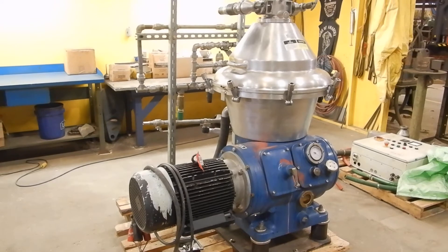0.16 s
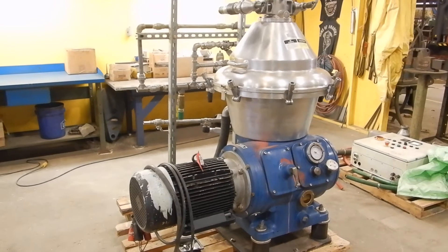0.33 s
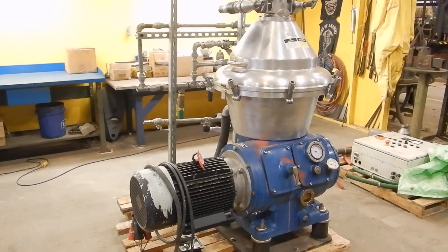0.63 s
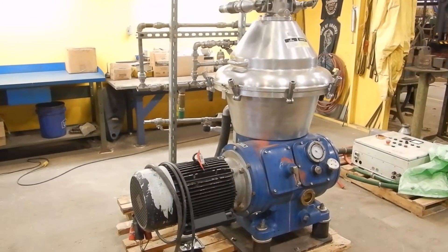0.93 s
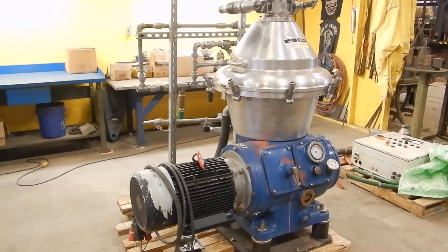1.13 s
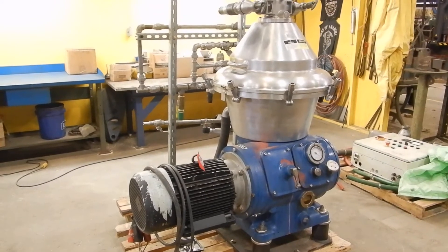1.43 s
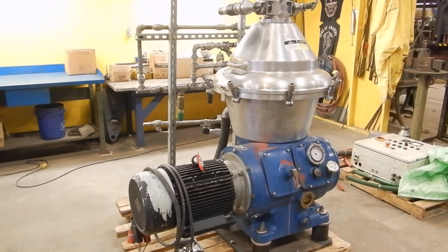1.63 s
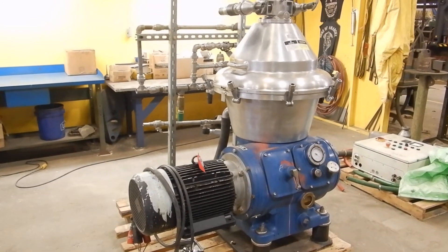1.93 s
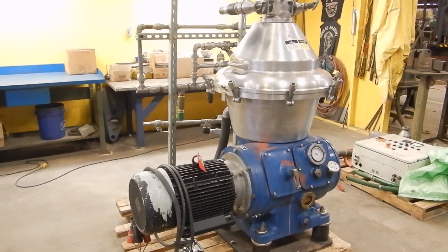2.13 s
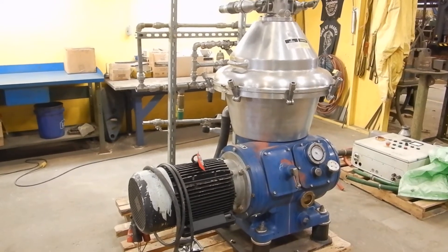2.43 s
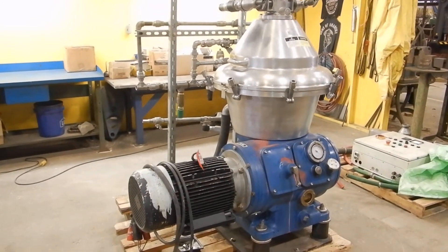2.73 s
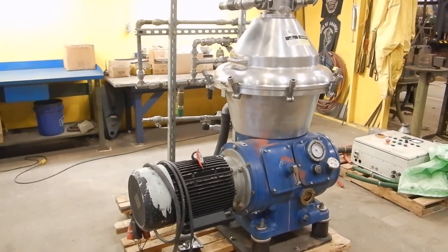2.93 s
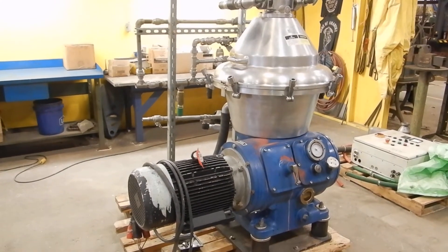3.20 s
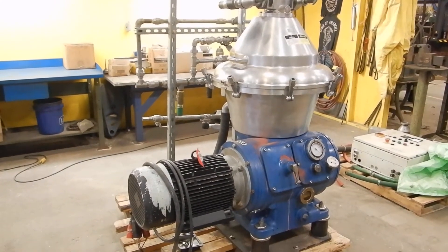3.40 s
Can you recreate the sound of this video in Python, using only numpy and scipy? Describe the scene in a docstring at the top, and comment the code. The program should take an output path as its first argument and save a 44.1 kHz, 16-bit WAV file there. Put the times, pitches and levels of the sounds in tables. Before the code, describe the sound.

A high whine from a big centrifuge pulses throughout, dipping a little in pitch and jumping back again and again. Beneath it are the even rush of spinning machinery and a soft, wavering hum, close by in a lightly echoing workshop.

```python
"""A high, throbbing whine sags in pitch and snaps back every third to half second, over a steady roar.
It is a large disc centrifuge in a workshop. The switching frequency of the motor drive modulates a
cluster of tones, and fainter clusters at twice and three times the pitch; all slide through the modes
of the motor frame. Bowl, fan and gears give broadband noise, coloured by the resonances of the casing.
A low wavering hum and a few faint tones come and go."""
import sys
import numpy as np
from scipy import signal
from scipy.fft import rfft, irfft, next_fast_len
from scipy.io import wavfile

SR = 44100
rng = np.random.default_rng(int(sys.argv[2]) if len(sys.argv) > 2 else 0)


def output_pcm(signal):
    """Save a mono or channel-first signal as 16-bit PCM at the path in sys.argv[1].

    Samples are clipped to [-1, 1] before scaling.
    """
    pcm = np.clip(np.atleast_2d(signal).T, -1, 1) * 32767
    wavfile.write(sys.argv[1], SR, np.round(pcm).astype(np.int16))


N = 156996

# noise spectrum of bowl, fan and gears, before its peaks and dips: f/Hz, spectral density level/dB
ROAR_SPECTRUM = [(25, -89), (40, -84), (60, -77.5), (75, -78.5), (119, -72.5), (181, -62.5), (250, -62),
                 (320, -65), (400, -60.5), (499, -65.5), (600, -68), (660, -70.5), (760, -65.5), (840, -61),
                 (960, -69), (1080, -59), (1220, -60.5), (1340, -65.5), (1420, -64), (1500, -57),
                 (1680, -45), (1850, -56), (1920, -60), (2050, -65), (2200, -67), (2430, -74.5),
                 (2700, -71.5), (3000, -72), (3150, -67.5), (3440, -65.5), (3700, -71.5), (3890, -78),
                 (4150, -74), (4500, -76), (4800, -77.5), (5110, -75), (5400, -82), (5700, -85.5),
                 (6080, -89), (6600, -86), (6880, -89), (7200, -93.5), (7600, -93.5), (8100, -100.0),
                 (8500, -99.1), (9260, -106.1), (10000, -117.9), (10400, -119.2), (10700, -114.6),
                 (12500, -118.1)]
# resonances of the casing, and narrow dips in the roar's spectrum: f/Hz, bandwidth/Hz, gain/dB
ROAR_PEAKS_AND_DIPS = [(57, 8, 1.5), (87, 7.5, 10), (196, 9.2, 1), (297.8, 4.7, 5), (341.8, 7.6, 8),
                       (448, 15, 6.5), (695.5, 15, 9), (819, 12, 4), (880, 9.6, 3), (932, 8.5, 10),
                       (983, 26, 4.5), (1257, 34, 4), (1400, 12, 3), (1410, 40, -5), (1560, 60, -7),
                       (1895, 50, -4), (3085, 60, -4), (2042, 26, 4), (2552, 24, 8.5), (4156, 48, 4.5),
                       (4440, 34, 2.5), (4870, 30, 3), (4930, 61, 5.5), (5270, 39, 6), (5820, 40, 6),
                       (6820, 60, 6), (7520, 60, 7)]
# interaural coherence of the roar: f/Hz, coherence
ROAR_COHERENCE = [(60, 0.77), (120, 0.97), (250, 1), (510, 0.99), (1040, 0.97), (2120, 0.91), (4320, 0.85),
                  (8810, 0.4)]
# interaural level of the roar: f/Hz, left over right/dB
ROAR_BALANCE = [(60, 1), (100, -0.5), (180, -1.5), (320, -1), (550, -1.5), (960, -1.5), (1670, -4),
                (2910, 0.5), (5060, -1.5), (8810, 0.5)]
# interaural phase of the roar: f/Hz, left lead/rad
ROAR_PHASE = [(0, 0), (1290, 0.2), (3360, 0.4), (4390, 0.37), (4740, 0.11), (5510, 0.89), (5940, 0.5),
              (6460, 0.93), (6890, 0.9), (7580, 1.0), (8010, 0.3), (8610, 0.86), (8960, 0.9)]
# envelope of the hum: t/s, level/dB
HUM_ENVELOPE = [(0.0, -47.5), (0.03, -32.5), (0.21, -45), (0.51, -29.5), (0.57, -32), (0.8, -27.5),
                (0.86, -31.5), (0.9, -35.5), (1.02, -42.5), (1.05, -30.5), (1.13, -40.5), (1.38, -42.5),
                (1.41, -59), (1.45, -36), (1.66, -50.5), (1.99, -33), (2.22, -45), (2.37, -32.5),
                (2.72, -43), (2.74, -37.5), (3.039, -40), (3.16, -32), (3.29, -42.5), (3.56, -50)]
# passing tones: onset t/s, duration/s, f/Hz, greatest level/dB
FAINT_TONES = [(1.65, .6, 190, -44), (2, .8, 88, -56), (2.5, 1, 860, -43.5), (-0.1, 3.3, 821, -51),
               (0.0, 3.56, 2556, -54.5)]
# instants at which the switching frequency starts to snap back: t/s
SNAP_TIMES = [-.36, -.02, .28, .63, .97, 1.345, 1.73, 2.13, 2.555, 3.005, 3.46, 3.93]
# motor tones, before the frame: multiple of the sweep, f/Hz at zero offset, level/dB,
# level slope with offset/(dB/Hz), left over right/dB, left lag/rad
WHINE_PARTIALS = [(1, 1430, -49.9, 0.13, -2.9, -0.3), (1, 1466.9, -42.9, -0.11, -2.8, -0.39),
                  (1, 1486.1, -47.0, -0.14, -2.4, -0.36), (1, 1520.1, -37.5, 0.5, -2.7, -0.39),
                  (1, 1576, -47.5, 0.73, -2.0, -0.34), (1, 1611.8, -34.0, 0.35, -2.1, -0.34),
                  (1, 1646.1, -38.0, 0.04, -2.0, -0.33), (1, 1664.5, -21.8, -0.1, -2.5, -0.32),
                  (1, 1732.8, -42.0, -0.03, -1.3, -0.3), (1, 1751.25, -25.2, -0.02, -1.7, -0.39),
                  (1, 1804.0, -38.5, 0.13, -1.5, -0.29), (1, 1841.1, -45.2, 0.11, -2.1, -0.32),
                  (1, 1857.9, -41.1, 0.35, -2.2, -0.29), (1, 1982.6, -34.8, -0.17, -1.6, -0.36),
                  (2, 3153.3, -60.1, -0.6, -0.4, -0.44), (2, 3182.2, -53.7, -0.27, -1.0, -0.5),
                  (2, 3240.7, -53.0, -0.18, 0.5, -0.54), (2, 3270, -59.7, -0.15, 0.8, -0.59),
                  (2, 3300, -55.8, 0.15, -0.2, -0.49), (2, 3332.3, -50.6, 0.14, -0.2, -0.49),
                  (2, 3385, -57.3, 0.01, 0.8, -0.68), (2, 3420.4, -55.6, 0.16, -1.2, -0.64),
                  (2, 3446, -54.4, 0.37, 0.3, -0.46), (2, 3471.6, -54.1, -0.08, -0.4, -0.43),
                  (2, 3526.7, -55.8, -0.09, 0.0, -0.34), (2, 3558.4, -51.7, -0.52, 1.1, -0.45),
                  (2, 3649.9, -55.1, 0.38, 1.6, -0.36), (2, 3730, -60.4, -0.55, 0.7, -0.28),
                  (3, 4903.5, -65.2, -0.3, -2.0, -0.45), (3, 5008.5, -63.7, 0.12, -4.1, -0.53),
                  (3, 5157.9, -65.2, -0.46, -1.0, -0.43)]
# amplitude modulation by the turning parts, the first once per turn of the motor shaft: f/Hz, depth/dB
ROTATION_THROBS = [(28.92, 2.0), (34.05, 2.4), (18.4, 1.1)]
# modes of the motor frame: f/Hz, bandwidth/Hz, gain/dB
FRAME_MODES = [(1522, 16, 4), (1657, 8, 1.5), (1972, 6, 1.5), (3135, 14, 3), (3165, 14, 3), (3220, 14, 5),
               (3310, 16, 5), (3400, 10, 8), (3445, 14, 5), (3475, 12, 5), (3540, 14, 5), (3625, 10, 4),
               (3650, 12, 6), (3705, 14, 6), (4880, 20, 8), (5010, 25, 6), (5132, 18, 8)]


def from_db(db):
    """Amplitude ratio of a level in decibels."""
    return 10 ** (np.asarray(db) / 20)


def at_hz(points, hz):
    """Interpolation of a table on a logarithmic frequency axis."""
    table_hz, values = np.transpose(points)
    return np.interp(np.log(hz), np.log(table_hz), values)


def drift(rate_hz, count):
    """Low-pass filtered noise: `count` rows of slow fluctuation with unit variance."""
    hop, settle = 64, 500
    pole = np.exp(-2 * np.pi * rate_hz * hop / SR)
    noise = rng.standard_normal((count, N // hop + settle + 2))
    slow = signal.lfilter([1], [1, -2 * pole, pole * pole], noise)[:, settle:]
    slow = slow / slow.std(axis=1, keepdims=True)
    return np.array([np.interp(np.arange(N) / hop, np.arange(len(row)), row) for row in slow])


def workshop_reverb(x, t60_s=.5):
    """Reverberation as convolution with exponentially decaying noise."""
    t = np.arange(int(t60_s * SR)) / SR
    tail = rng.standard_normal((2, SR))[:, :len(t)] * from_db(-60 * t / t60_s)
    tail = tail + 2.9 * tail[:1]   # mostly common to both ears
    tail = tail / np.sqrt((tail ** 2).sum(axis=1, keepdims=True))
    return signal.fftconvolve(x[None], tail, axes=1)[:, :N]


def machine_roar(offset_hz):
    """Source and filter: partly coherent noise of bowl, fan and gears, shaped by casing resonances."""
    hz = np.maximum(np.arange(N // 2 + 1) * SR / N, 1)
    power_gain = 1 + sum((from_db(2 * db) - 1) / (1 + (2 * (hz - f) / width) ** 2)
                         for f, width, db in ROAR_PEAKS_AND_DIPS)
    magnitude = from_db(at_hz(ROAR_SPECTRUM, hz)) * np.sqrt(np.maximum(power_gain, .01))
    mid, side = rfft(rng.standard_normal((2, N))) * magnitude
    coherence = np.clip(at_hz(ROAR_COHERENCE, hz), 0, 1)
    ears = np.array([[1], [-1]])
    spectrum = np.sqrt(1 + coherence) * mid + np.sqrt(1 - coherence) * side * ears
    spectrum *= from_db(at_hz(ROAR_BALANCE, hz) / 2 * ears)
    spectrum *= np.exp(.5j * at_hz(ROAR_PHASE, hz) * ears)
    # the band round the second cluster swells as the switching frequency sags
    low_hz, high_hz = 3050, 3800
    swell_db, threshold_hz, knee_hz = 2.7, 2.5, 1.2
    band = 1 / (1 + (low_hz / hz) ** 40) / (1 + (hz / high_hz) ** 40)
    swell = from_db(swell_db * np.tanh((threshold_hz - offset_hz) / knee_hz))
    return np.sqrt(SR / 4) * (irfft(spectrum * (1 - band), N) + swell * irfft(spectrum * band, N))


def faint_tones(wander_rad=.35):
    """Sinusoids with slight random phase modulation, each under an arched envelope."""
    t, out = np.arange(N) / SR, np.zeros(N)
    wander = drift(rate_hz=4.0, count=len(FAINT_TONES))
    for k, (onset, duration, hz, db) in enumerate(FAINT_TONES):
        progress = np.clip((t - onset) / duration, 0, 1)
        arch = np.sqrt(np.sin(np.pi * progress).clip(0))
        out += np.sqrt(2) * from_db(db) * arch * np.sin(2 * np.pi * hz * t + wander_rad * wander[k])
    return out


def hum(hz=409.2, flutter_db=.6, wander_rad=.35):
    """Random amplitude and phase modulation make one low tone waver as it comes and goes."""
    t = np.arange(N) / SR
    times, levels = np.transpose(HUM_ENVELOPE)
    flutter, wander = drift(rate_hz=9.6, count=2)
    level_db = np.interp(t, times, levels) + flutter_db * flutter
    return np.sqrt(2) * from_db(level_db) * np.sin(2 * np.pi * hz * t + wander_rad * wander)


def motor_frame(x):
    """Forced resonance: each mode of the frame adds its ringing to the direct sound."""
    size = next_fast_len(N + SR // 2)
    hz = np.arange(size // 2 + 1) * SR / size
    response = 1 + sum((from_db(db) - 1) / (1 + 2j * (hz - f) / width) for f, width, db in FRAME_MODES)
    return irfft(rfft(x, size) * response, size)[:, :N]


def drive_sweep(top_hz=8.0, bottom_hz=-13.0, rise_s=.065, sag_share=.85):
    """Sawtooth modulation: the offset of the switching frequency, and the time since the last snap."""
    t, snaps = np.arange(N) / SR, np.array(SNAP_TIMES)
    cycle = np.searchsorted(snaps, t, "right") - 1
    since_snap = t - snaps[cycle]
    sag_s = sag_share * (snaps[cycle + 1] - snaps[cycle] - rise_s)
    sagged = np.clip((since_snap - rise_s) / sag_s, 0, 1)
    height = np.minimum(1 - sagged, since_snap / rise_s)
    return bottom_hz + (top_hz - bottom_hz) * height, since_snap


def motor_whine(offset_hz, since_snap):
    """Frequency modulation: every partial follows the drive's sweep and wavers a little on its own."""
    waver_db, wander_rad = .7, .1
    dip_db, dip_s = -3.5, .045
    core_low_hz, core_high_hz = 1600, 1900   # only the core of the main cluster throbs
    t, out = np.arange(N) / SR, np.zeros((2, N))
    sweep_cycles = np.cumsum(offset_hz) / SR
    count = len(WHINE_PARTIALS)
    waver, wander = drift(rate_hz=6.0, count=count), drift(rate_hz=6.0, count=count)
    start_cycles = rng.random(count)
    throb_db = sum(db * np.sin(2 * np.pi * hz * t) for hz, db in ROTATION_THROBS)
    for k, (multiple, hz, db, slope, pan_db, lag) in enumerate(WHINE_PARTIALS):
        cycles = hz * t + multiple * sweep_cycles + start_cycles[k]
        phase = 2 * np.pi * cycles + multiple * wander_rad * wander[k]
        level_db = db + slope * (offset_hz - offset_hz.mean()) + waver_db * waver[k]
        if core_low_hz < hz < core_high_hz:
            level_db += throb_db
        amplitude = np.sqrt(2) * from_db(level_db)
        out[0] += amplitude * from_db(pan_db / 2) * np.sin(phase - lag)
        out[1] += amplitude * from_db(-pan_db / 2) * np.sin(phase)
    falter = since_snap / dip_s * np.exp(1 - since_snap / dip_s)   # peaks while the frequency jumps
    return out * from_db(dip_db * falter)


def scene(reverb_db=-18):
    """Superposition of whine, hum and faint tones, their reverberation, and the roar."""
    offset_hz, since_snap = drive_sweep()
    tones = motor_frame(motor_whine(offset_hz, since_snap)) + hum() + faint_tones()
    reverb = from_db(reverb_db) * workshop_reverb(tones.mean(axis=0))
    return tones + reverb + machine_roar(offset_hz)


def record(dry, stopband_hz=13000):
    """A steep low-pass filter attenuates the highest treble."""
    return signal.sosfilt(signal.cheby2(16, 20, stopband_hz, fs=SR, output="sos"), dry)


dry = scene()
out = record(dry)
output_pcm(out)
```